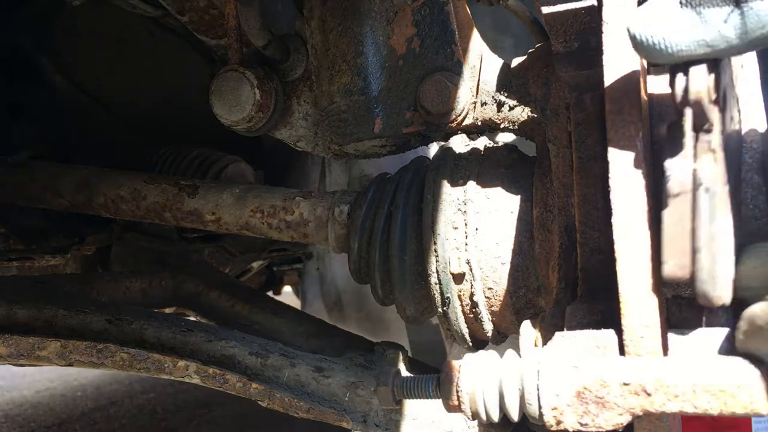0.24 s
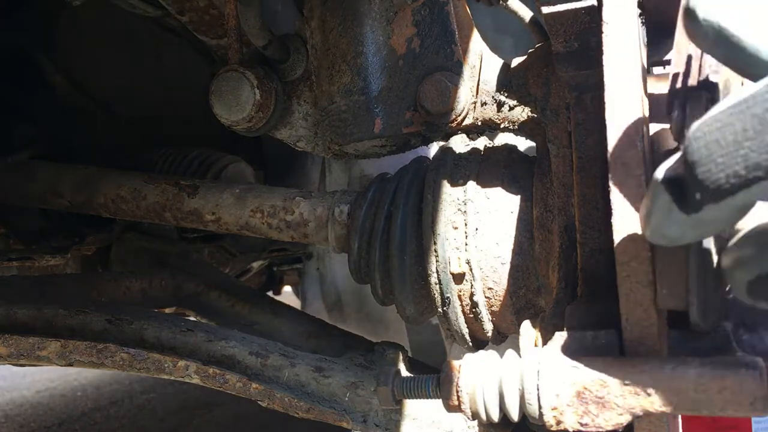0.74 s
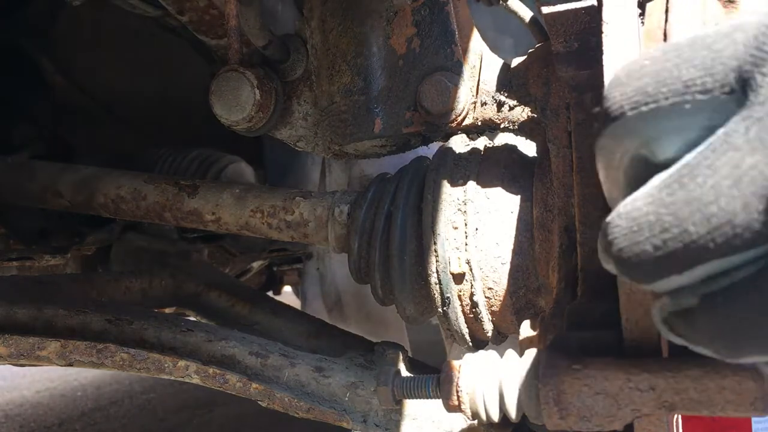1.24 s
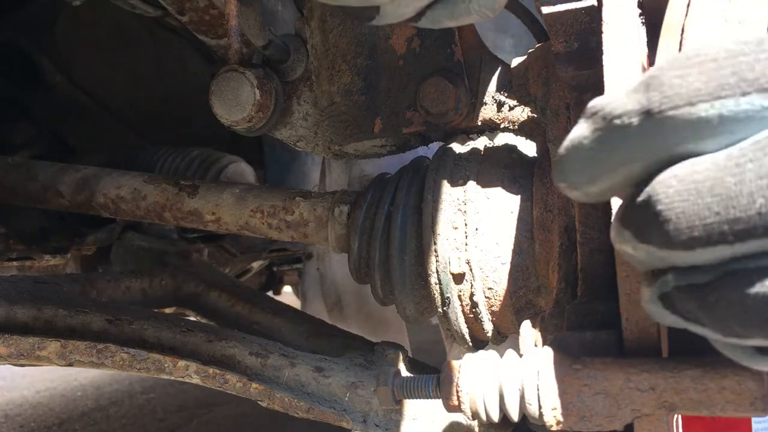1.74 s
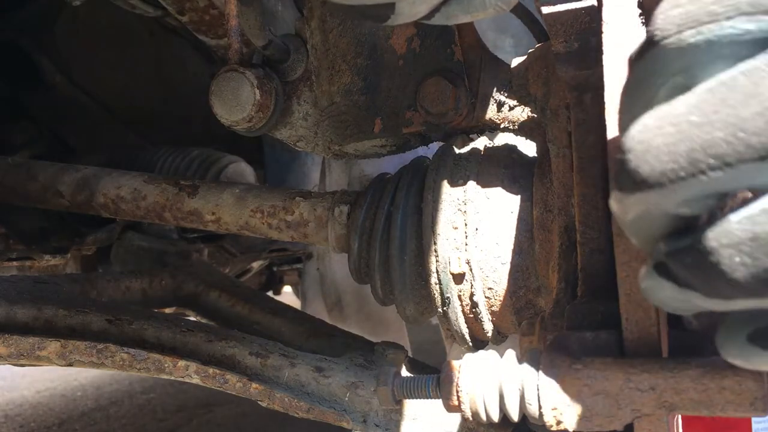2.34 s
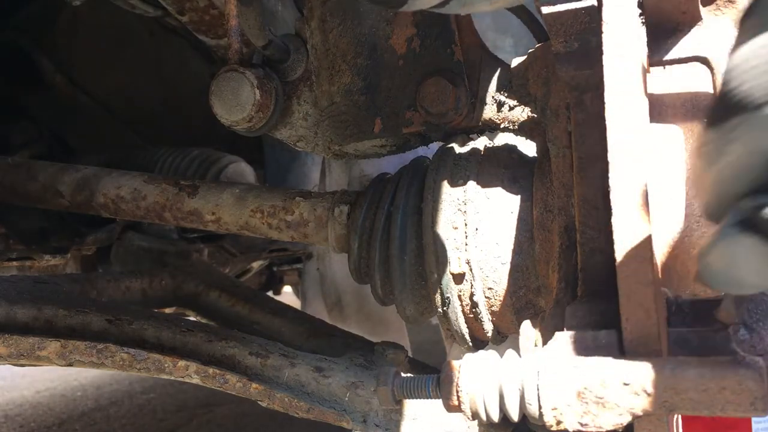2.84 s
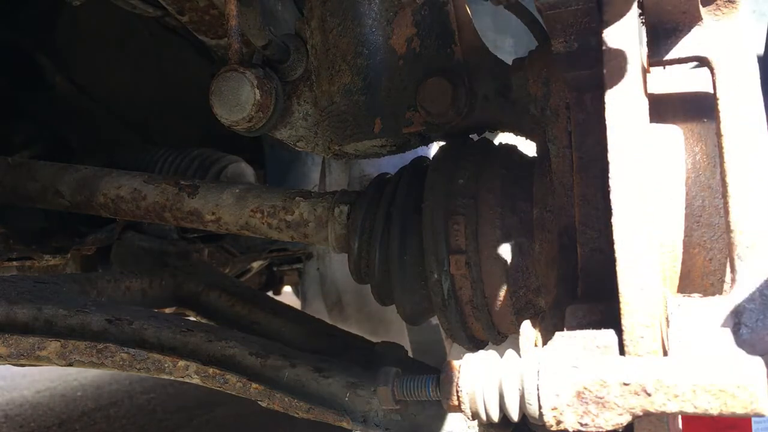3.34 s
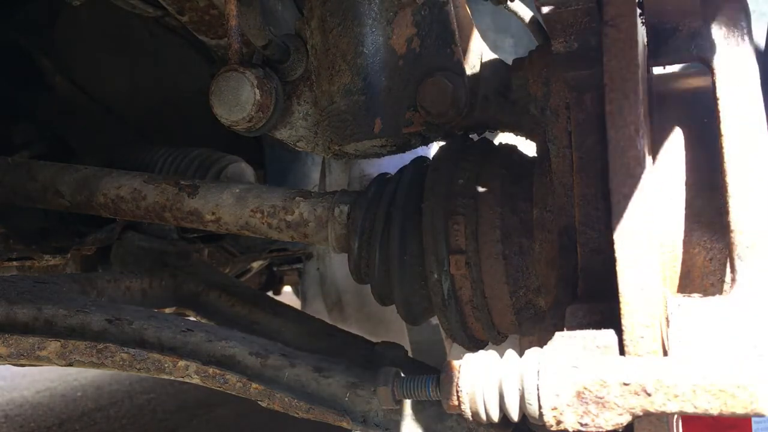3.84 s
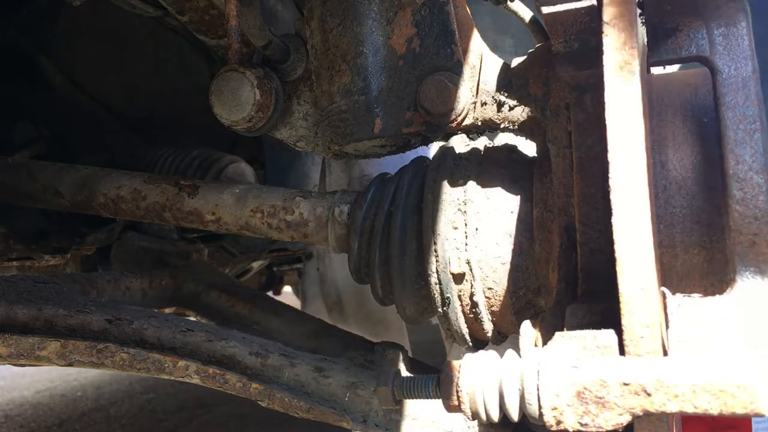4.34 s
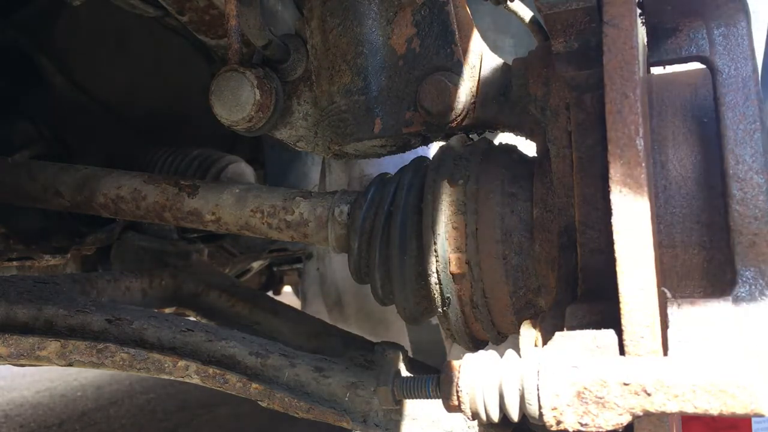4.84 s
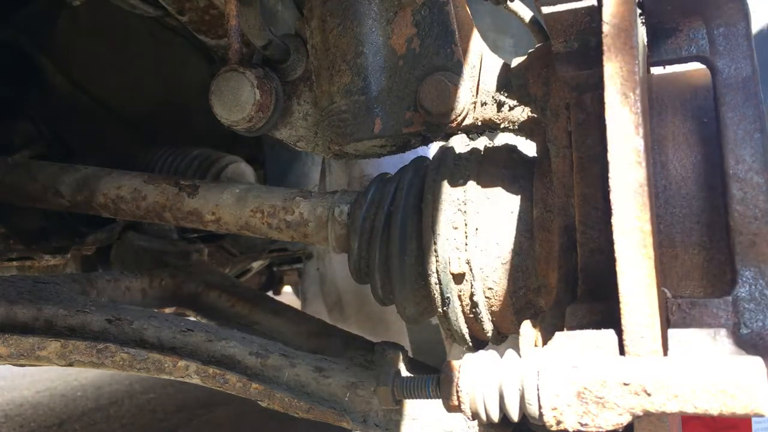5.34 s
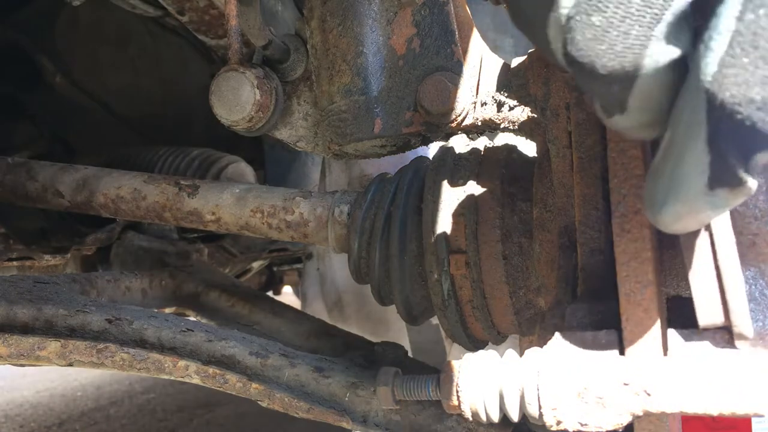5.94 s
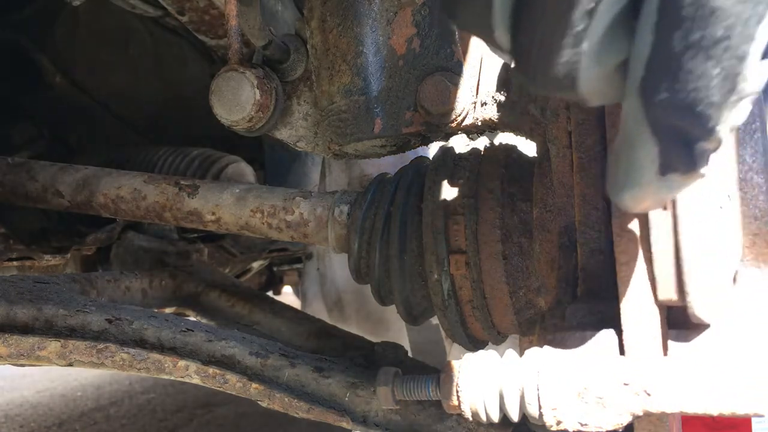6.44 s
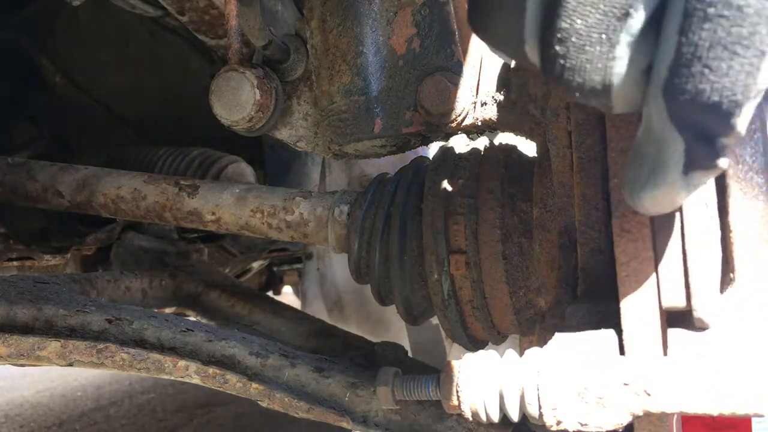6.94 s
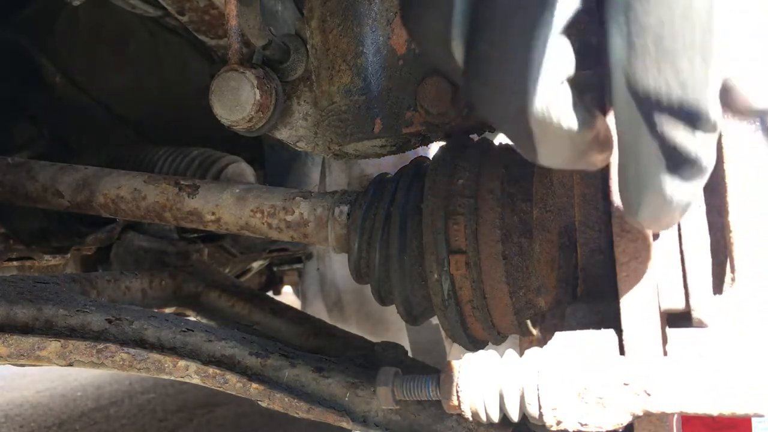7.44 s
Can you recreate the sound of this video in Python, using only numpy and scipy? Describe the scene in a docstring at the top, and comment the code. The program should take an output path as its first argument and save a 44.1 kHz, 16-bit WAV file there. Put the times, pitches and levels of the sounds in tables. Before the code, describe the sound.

Close in a wheel well outdoors, low bassy air rumble runs throughout. At 0 s a hard, dry knock of iron on iron, a light tap just after, then at 0.3-0.4 s a pair of knocks with a clear, short plate clink; a dull tap at 0.6 s. Gloves rustle. From about 0.9 to 2 s there are only faint scraping, low grinding and light ticks. Between 2.2 and 2.9 s a small clink, soft grinding and several moderate knocks. From 3 to 5.8 s it is quiet: brief slips, cloth rubbing, a faint distant traffic drone around 4.4-5.4 s. At 5.9 s a knock with a crisp clip snap, then a loud ringing clank at 6.12 s amid scraping, lesser knocks to 6.75 s, a hard clank at 6.95 s, and the brightest, loudest snapping clack at 7.18 s after a quick scrape. Rumble and faint cloth remain.

```python
"""A hard knock of metal on metal is heard first: brake pads are pushed into a car's caliper bracket.
From inside the wheel well, each blow excites bracket modes and dense body vibration, shaped by its contact.
A loosely held pad clinks in a few plate modes, spring clips snap in noise bursts, and sliding pads scrape
in random slips. Gloves and sleeves rustle as uneven noise strokes over a low outdoor rumble of shaped noise."""
import sys
import numpy as np
from scipy import signal
from scipy.io import wavfile

SR = 44100
rng = np.random.default_rng(int(sys.argv[2]) if len(sys.argv) > 2 else 0)


def log_audio(samples):
    """Write samples as a 16-bit WAV file to the path given in sys.argv[1]."""
    # one column per channel
    frames = np.atleast_2d(samples).T
    # limit to full scale, then quantise
    limited = np.clip(frames, -1, 1)
    pcm = np.round(limited * 32767).astype(np.int16)
    wavfile.write(sys.argv[1], SR, pcm)


N = 339570
TIME = np.arange(N) / SR
AGE = TIME[:SR]   # seconds since the start of one event
EDGES = 22 * 2 ** (np.arange(30) / 3)   # third-octave band edges, Hz
CENTRES = np.sqrt(EDGES[1:] * EDGES[:-1])

# Outdoor rumble over time. Each row: time in seconds, level in dB.
RUMBLE_LEVEL = [(0, -47.5), (1.3, -53.5), (2.9, -51.5), (3.8, -52), (4.8, -51.5), (5.6, -51.5), (7.0, -47),
                (7.7, -50)]
# Spectrum of the outdoor air. Each row: frequency in Hz, density in dB per Hz.
AIR_SPECTRUM = [(25, -18.5), (45, 1.5), (85, -3), (140, -13), (220, -19.5), (400, -27.5), (700, -30),
                (1500, -34), (4000, -55.5), (14000, -61.5)]
# Far traffic droning up and fading. Each row: start in seconds, length in seconds, level in dB, centre in Hz.
TRAFFIC_DRONES = [(4.4, 0.96, -50.5, 85.6), (5.398, .47, -60.5, 245)]
# Spectrum of rubbing fabric. Each row: frequency in Hz, density in dB per Hz.
CLOTH_SPECTRUM = [(700, -3.5), (2900, 0.5), (4200, -3.5), (6000, -5), (8500, -7.5), (12800, -3.5),
                  (15500, -5)]
# Likeness of the cloth noise at the two ears. Each row: frequency in Hz, likeness from 0 to 1.
EAR_LIKENESS = [(2500, 1.0), (5000, 0.99), (8000, 0.27), (14000, .76)]
# Clear strokes of gloves and sleeves. Each row: middle in seconds, length in seconds, level in dB.
CLOTH_STROKES = [(0.37, 0.089, -51.5), (0.541, 0.028, -61), (0.68, 0.057, -54.5), (1.28, 0.087, -60),
                 (1.819, 0.065, -57.5), (2.25, 0.24, -67), (3.26, 0.29, -63.5), (4.533, 0.29, -60.5),
                 (5.088, 0.16, -56.5), (5.291, 0.066, -56.5), (6.026, 0.058, -54), (6.3, 0.34, -59.5),
                 (7.462, 0.16, -62)]
# Small finger movements between the strokes. Each row: time in seconds, level in dB.
FIDGET_LEVEL = [(0, -70.5), (0.9, -65.5), (2.1, -67.5), (3.7, -70.5), (4.3, -63.5), (5.5, -71),
                (6.4, -73.5), (6.7, -73.5), (7.7, -68.5)]
# Pad sliding in the clips. Each row: start in seconds, length in seconds, level in dB.
PAD_SLIDES = [(0.945, 0.34, -61), (1.711, 0.011, -46), (2.065, .012, -48.5), (2.784, 0.097, -57),
              (3.423, 0.042, -53), (3.862, 0.04, -56.5), (4.837, 0.048, -54), (5.029, .068, -57),
              (5.992, 0.42, -52.5), (6.25, 0.089, -58), (6.551, 0.017, -63), (6.724, 0.033, -70),
              (6.915, 0.046, -44.5), (7.157, 0.076, -36)]
# Hand shoving the pad home, a low grind. Each row: start in seconds, length in seconds, level in dB.
PAD_SHOVES = [(1.128, .28, -58), (2.251, 0.11, -54), (2.568, 0.43, -58)]
# Spring clip snapping. Each row: start in seconds, level in dB, centre in Hz.
CLIP_SNAPS = [(1.126, -44.5, 10900), (2.179, -52, 12700), (2.603, -49, 12000), (5.872, -33.5, 6530),
              (6.248, -46, 11700), (7.182, -15.5, 5400)]
# Pad ringing freely. Each row: start in seconds, level in dB, tilt in dB per octave,
# share of the free ring time that the grip leaves, build-up in seconds at 1 kHz.
PAD_CLINKS = [(0.362, -19.5, -1.5, .9, 0.0019), (2.258, -39, 0, 0.84, 0.0023),
              (2.401, -50.5, -17, .6, .004), (6.027, -34.5, -20, 0.72, .003),
              (6.148, -15, -10, 0.75, 0.021), (6.252, -37, -2, 1.0, 0.0016),
              (6.862, -31.5, -13, 0.92, 0.0074), (6.95, -41.5, -14.5, 0.71, .002),
              (7.182, -27, -8, 0.9, .002)]
# Modes of a pad. Each row: frequency in Hz, relative level in dB, free ring time T60 in seconds.
PAD_MODES = [(995, -20, .33), (1720, -21, .66), (2727, 0, .25), (3009, -16, .08), (3461, -18, .09),
             (4023, -9, .35), (5565, -27, .17), (7335, -28, .18)]
# Pad against bracket. Each row: start in seconds, level in dB, contact brightness in Hz.
PAD_KNOCKS = [(0.000, -20, 2780), (0.079, -35, 1060), (0.181, -55.5, 910), (0.317, -24.5, 1290),
              (0.409, -23, 1280), (0.637, -36.5, 1510), (1.152, -48, 520), (1.312, -56, 900),
              (1.488, -49.5, 1200), (1.507, -41, 1320), (2.161, -56, 890), (2.219, -47.5, 1300),
              (2.256, -48, 1100), (2.540, -34.5, 1460), (2.596, -52.5, 1500), (2.685, -38.5, 1770),
              (2.929, -32.5, 1340), (4.217, -55, 1940), (5.874, -22.5, 1738), (6.024, -40.5, 1100),
              (6.123, -13.5, 2330), (6.146, -25, 2350), (6.232, -27, 1820), (6.283, -40, 1170),
              (6.429, -35.5, 1060), (6.750, -31.5, 1683), (6.86, -37, 1413), (6.946, -15, 2497),
              (7.184, -11, 3840)]
# Modes of bracket and knuckle. Each row: frequency in Hz, relative level in dB, T60 in seconds.
BRACKET_MODES = [(168, -30, .17), (248, -35, .15), (298, -28, .17), (554, -25, .15), (590, -22, .14),
                 (765, -25, .12), (922, -24, .11), (1022, -21, .11), (1094, -23, .35), (1195, -22, .13),
                 (1306, -26, .2), (1371, -15, .07), (1455, -12, .07), (1510, -12, .085), (1583, -4.5, .075),
                 (1652, -11, .075), (1824, -7, .065), (1938, -13, .075), (2238, -11, .055),
                 (2581, -4, .055), (2660, -12, .06), (2950, -12, .075), (3052, -14, .06), (3461, -17, .1),
                 (3860, -16, .045), (5650, -15, .04), (6950, -7, .06)]
# Dense vibration of the suspension behind the bracket. Each row: frequency in Hz, density in dB per Hz.
BODY_SPECTRUM = [(100, -28.5), (170, -16.5), (350, -20.5), (560, -7), (800, -13.5), (1150, -5), (1650, -1),
                 (2200, -7.5), (3000, -2.5), (4500, -4), (7000, -21), (10000, -23), (15000, -26)]
# Decay of that dense vibration. Each row: frequency in Hz, T60 in seconds.
BODY_DECAY = [(150, 0.42), (500, .11), (1500, 0.11), (4000, .055), (12000, 0.045)]

# A quick slip is brighter than a long drag: centre of a 0.1 s slide, and the power by which it falls with length.
SLIDE_HZ, SLIDE_FALL = 1940, .45
SHOVE_HZ = 157
# A light knock is mostly the hand's dull thud: bass boost at the reference level, and its loss per dB of force.
REFERENCE_DB, THUD_DB, THUD_LOSS = -30, 6, 0.5
# Every knock and clink jars the clips: level against a blow at the reference level, growth in dB per dB, centre.
JAR_KNOCK_DB, JAR_CLINK_DB, JAR_GROWTH, JAR_HZ = -23, -24, 1.22, 3930
# Each knock is preceded by a faint copy of itself: lead, and level against the knock's.
LEAD_IN_S, LEAD_IN_DB = .005, -19.5
# Knocks above HEAVY_DB first land on one corner: lead, level and brightness against the blow's.
HEAVY_DB = -18
CORNER_LEAD_S, CORNER_DB, CORNER_DULLING = .011, -13, 0.65
# Knocks are given one common emphasis: modes about this pitch are raised.
EMPHASIS_HZ = 1600
CUTOFF_HZ = 15900


def from_db(db):
    """Amplitude gain is ten to the power of a twentieth of the decibels."""
    return 10 ** (np.asarray(db) / 20)


def rms(x):
    """The root mean square expresses a signal's mean power as an amplitude."""
    return np.sqrt(np.mean(x ** 2) + 1e-20)


def in_time(rows):
    """Linear interpolation gives a time curve at every sample."""
    return np.interp(TIME, *np.transpose(rows))


def at_hz(points, hz):
    """A frequency curve is interpolated on a logarithmic axis, so equal ratios are equal steps."""
    table_hz, values = np.transpose(points)
    return np.interp(np.log(hz), np.log(table_hz), values)


def add(out, s, sound):
    """Superposition: a sound is summed into the mix from time s."""
    start = max(0, round(s * SR))
    out[start:start + len(sound)] += sound[:N - start]


def drift(rate):
    """Random knots, joined by straight lines, form a slow fluctuation of unit spread at the knots."""
    knots = np.arange(0, TIME[-1] + 1, 1 / max(rate, 1))
    return np.interp(TIME, knots, rng.standard_normal(len(knots)))


def noise_bands(size):
    """White noise is split into third-octave bands; neighbours come from independent sources."""
    white = rng.standard_normal((2, size))
    bands = []
    for k in range(len(CENTRES)):
        band_pass = signal.butter(2, EDGES[k:k + 2], "band", fs=SR, output="sos")
        bands.append(signal.sosfilt(band_pass, white[k % 2]))
    return np.array(bands)


def around(x, hz, spread):
    """A band-pass keeps the energy within a frequency ratio of its centre."""
    ratio = max(spread, 1.1)
    limits = [min(hz / ratio, SR / 3), min(hz * ratio, .45 * SR)]
    return signal.sosfilt(signal.butter(2, limits, "band", fs=SR, output="sos"), x)


def dying(t60):
    """Exponential decay: the level falls by 60 dB in each T60, one row per value."""
    return np.exp(-np.log(1000) * AGE / np.reshape(t60, (-1, 1)))


def swell(hz, rise_s):
    """Vibration takes time to spread through the iron; low bending waves travel slowest."""
    rise = rise_s * np.sqrt(1000 / hz[:, None])
    return 1 - np.exp(-(AGE / rise) ** 2)


def ringing(hz):
    """Each mode of vibration is a sinusoid at its natural frequency, one row per mode."""
    return np.sin(2 * np.pi * hz[:, None] * AGE)


def stroke(length):
    """A push builds up and lets go as the square root of half a sine."""
    return np.sqrt(np.abs(np.sin(np.pi * np.minimum(AGE / length, 1))))


def outdoors(low_cut_hz=38):
    """Broadband air noise weighted to the bass makes a rumble; narrow bands of noise drone in it."""
    air = from_db(at_hz(AIR_SPECTRUM, CENTRES)) @ noise_bands(N)
    air = signal.sosfilt(signal.butter(4, low_cut_hz, "high", fs=SR, output="sos"), air)
    out = from_db(in_time(RUMBLE_LEVEL)) * air / rms(air)
    for s, length, db, hz in TRAFFIC_DRONES:
        # the first second lets the narrow filter settle
        drone = around(rng.standard_normal(2 * SR), hz, spread=1.135)[SR:]
        add(out, s, from_db(db) * stroke(length) * drone / rms(drone))
    return out


def gloves(fidget_db=1.0, uneven_db=4.5, grain_db=3.0):
    """Rubbing fabric is friction noise in uneven strokes; only its treble differs between the ears."""
    colour = from_db(at_hz(CLOTH_SPECTRUM, CENTRES)) * (CENTRES > 600)
    alike = np.clip(at_hz(EAR_LIKENESS, CENTRES), 0, 1)
    mid = colour @ noise_bands(N)
    side = (colour * np.sqrt((1 - alike) / (1 + alike))) @ noise_bands(N)
    fingers = from_db(in_time(FIDGET_LEVEL) + fidget_db * drift(9.8))
    power = fingers ** 2
    for middle, length, db in CLOTH_STROKES:
        power = power + from_db(db) ** 2 * np.exp(-(2 * (TIME - middle) / length) ** 2)
    catching = from_db(uneven_db * drift(22) + grain_db * drift(200))   # the weave catches and slides
    ears = mid + side * [[1], [-1]]
    return np.sqrt(power) * catching * ears / rms(mid)


def scrapes(grit_db=3.0, ring_db=-4, slips_per_s=4000):
    """Stick-slip friction: rust grains catch, slip and set the bracket singing; a hard shove grinds low."""
    out = np.zeros(N)
    hz, _, t60 = np.transpose(BRACKET_MODES)
    bracket = (dying(t60) * ringing(hz) / np.sqrt(t60[:, None])).sum(0)
    slides = [(s, length, db, SLIDE_HZ * (10 * length) ** -SLIDE_FALL) for s, length, db in PAD_SLIDES]
    shoves = [(*shove, SHOVE_HZ) for shove in PAD_SHOVES]
    for s, length, db, centre_hz in slides + shoves:
        happens = rng.random(SR) < slips_per_s / SR
        slips = happens * rng.standard_normal(SR) * from_db(grit_db * rng.standard_normal(SR))
        grit = around(slips + 1e-18, centre_hz, spread=2.18)
        grit = stroke(length) * grit / rms(grit)
        singing = signal.fftconvolve(grit, bracket)[:SR]
        singing = singing * rms(grit) / rms(singing)
        scrape = (grit + from_db(ring_db) * singing) / np.hypot(1, from_db(ring_db))
        add(out, s, from_db(db) * scrape)
    return out


def jarred(blows, jar_db):
    """Nonlinear response: the snaps that blows shake out of the clips grow faster than the blows."""
    return [(s, REFERENCE_DB + jar_db + JAR_GROWTH * (db - REFERENCE_DB), JAR_HZ) for s, db, *_ in blows]


def snaps(t60=0.012, tail_db=-22, tail_t60=0.055, rise_s=0.00047,
          splash_db=-13, splash_hz=12800, splash_limit_db=-37):
    """Stored strain is released: thin spring steel lets go in a short crack and a splash of treble."""
    out = np.zeros(N)
    decay = (dying(t60) + from_db(tail_db) * dying(tail_t60))[0]
    fade = decay * (1 - np.exp(-AGE / rise_s))
    onset = slice(0, SR // 200)
    for s, db, hz in CLIP_SNAPS + jarred(PAD_KNOCKS, JAR_KNOCK_DB) + jarred(PAD_CLINKS, JAR_CLINK_DB):
        burst = rng.standard_normal(SR) * fade
        crack = around(burst, hz, spread=1.176)
        splash = around(burst, splash_hz, spread=1.2)
        add(out, s, from_db(db) * crack / rms(crack[onset]))
        add(out, s, from_db(min(db + splash_db, splash_limit_db)) * splash / rms(splash[onset]))
    return out


def clinks():
    """Modal ringing of a plate: a loosely held pad sounds a few pure modes, damped by the grip."""
    out = np.zeros(N)
    hz, mode_db, t60 = np.transpose(PAD_MODES)
    tones = ringing(hz)
    octaves = np.log2(np.maximum(hz, 1700) / 2700)
    for s, db, tilt_db, freedom, rise_s in PAD_CLINKS:
        strength = from_db(db + mode_db + tilt_db * octaves)
        # dragged along an edge, the ring builds up slowly
        add(out, s, strength @ (tones * swell(hz, rise_s) * dying(t60 * freedom)))
    return out


def contact(hz, bright_hz, thud_db, steep=3.04, weight_hz=1080):
    """Contact stiffness sets the spectrum: a soft one loses treble; a hand's weight behind it adds bass."""
    bass = from_db(thud_db / (1 + (hz / weight_hz) ** 6))
    return bass / np.sqrt(1 + (hz / bright_hz) ** (2 * steep))


def knocks(rise_s=0.0024, scatter_db=1.0, tail_db=-36, tail_t60=0.21, modes_db=-10,
           emphasis_peak_db=6.5, bass_limit_db=19):
    """Impact excitation: a blow rings bracket modes and the dense body; the wheel well keeps a faint tail."""
    out = np.zeros(N)
    onset = slice(0, SR // 60)
    hz, mode_db, t60 = np.transpose(BRACKET_MODES)
    rings = dying(t60) * swell(hz, rise_s) * ringing(hz)
    decay = dying(at_hz(BODY_DECAY, CENTRES)) + from_db(tail_db) * dying(tail_t60)
    fade = decay * swell(CENTRES, rise_s)
    bands = noise_bands(N)
    body_gain = from_db(at_hz(BODY_SPECTRUM, CENTRES))
    emphasis_db = emphasis_peak_db * np.exp(-(np.log2(hz / EMPHASIS_HZ) / 0.14) ** 2)
    corners = [(s - CORNER_LEAD_S, db + CORNER_DB, bright_hz * CORNER_DULLING)
               for s, db, bright_hz in PAD_KNOCKS if db > HEAVY_DB]
    for s, db, bright_hz in PAD_KNOCKS + corners:
        thud_db = min(THUD_DB - THUD_LOSS * (db - REFERENCE_DB), bass_limit_db)
        start = rng.integers(SR // 10, N - SR)   # a random stretch of noise for each blow
        body = (body_gain * contact(CENTRES, bright_hz, thud_db)) @ (bands[:, start:start + SR] * fade)
        strength = from_db(modes_db + mode_db + emphasis_db + scatter_db * rng.standard_normal(len(hz)))
        strength = strength * rng.choice([-1, 1], len(hz))
        blow = body + (strength * contact(hz, bright_hz, thud_db)) @ rings
        blow = from_db(db) * blow / rms(blow[onset])
        add(out, s - LEAD_IN_S, from_db(LEAD_IN_DB) * blow)
        add(out, s, blow)
    return out


def scene():
    """Superposition of all sources; all but the gloves are straight ahead, alike in both channels."""
    return outdoors() + gloves() + scrapes() + snaps() + clinks() + knocks()


def record(dry):
    """Saturation rounds the highest peaks, and a steep low-pass cuts the top."""
    rounded = dry / (1 + dry ** 6) ** (1 / 6)
    return signal.sosfilt(signal.ellip(10, .2, 80, CUTOFF_HZ, fs=SR, output="sos"), rounded)


dry = scene()
out = record(dry)
log_audio(out)
```